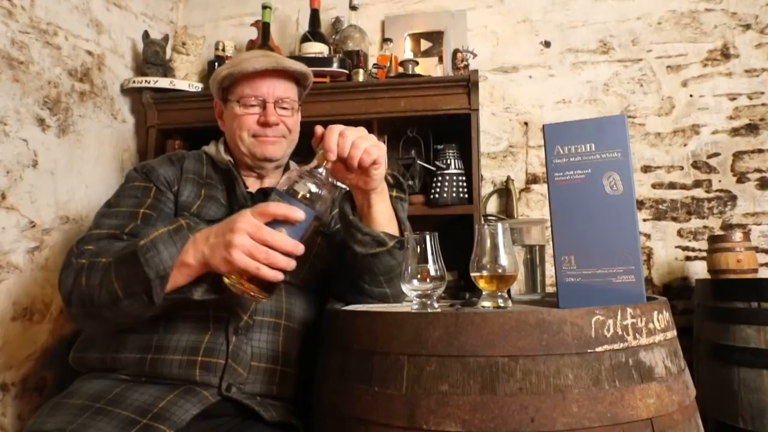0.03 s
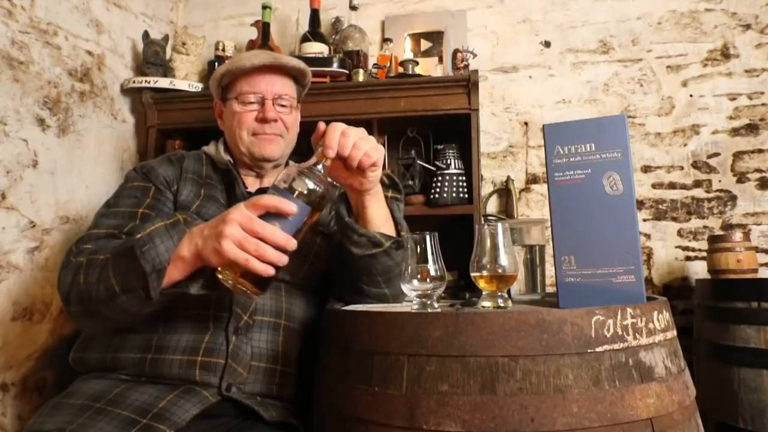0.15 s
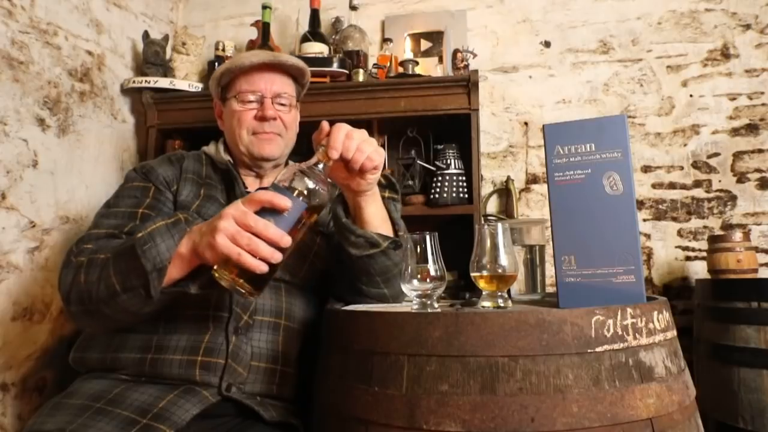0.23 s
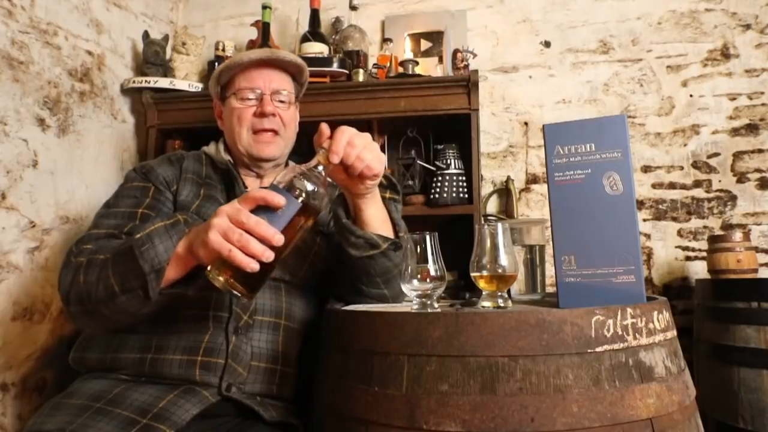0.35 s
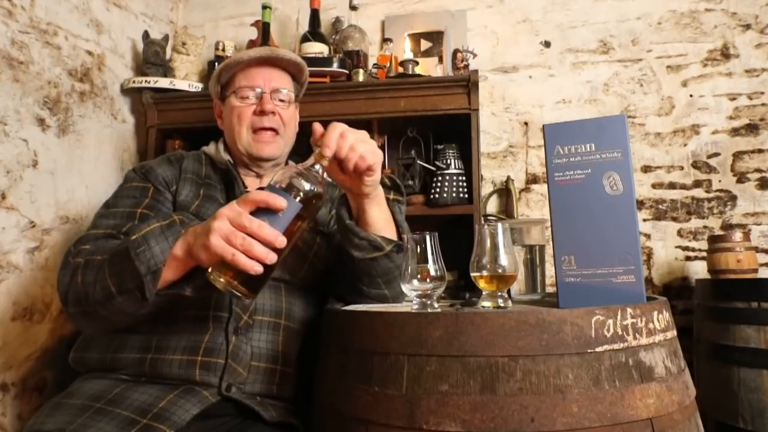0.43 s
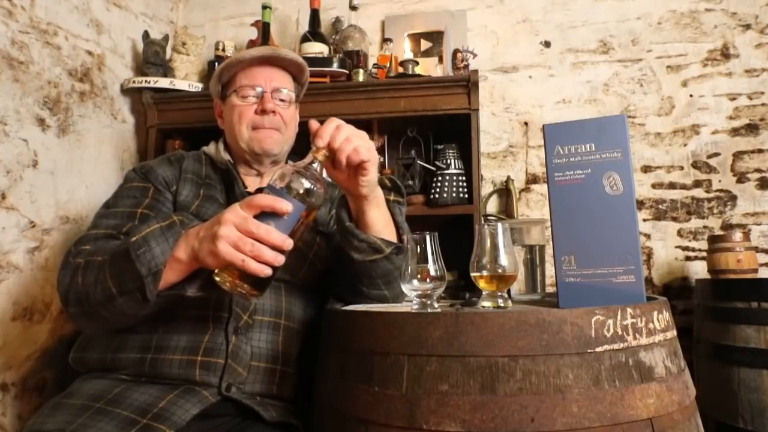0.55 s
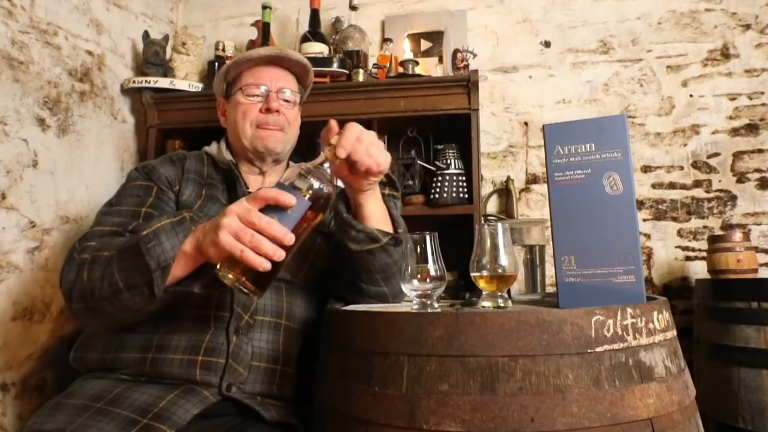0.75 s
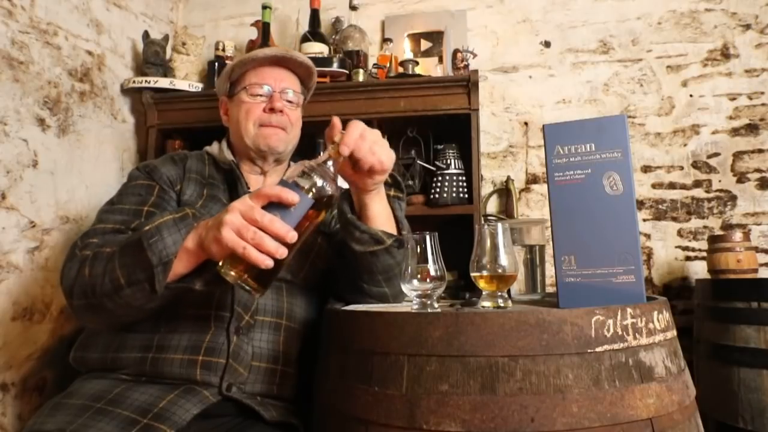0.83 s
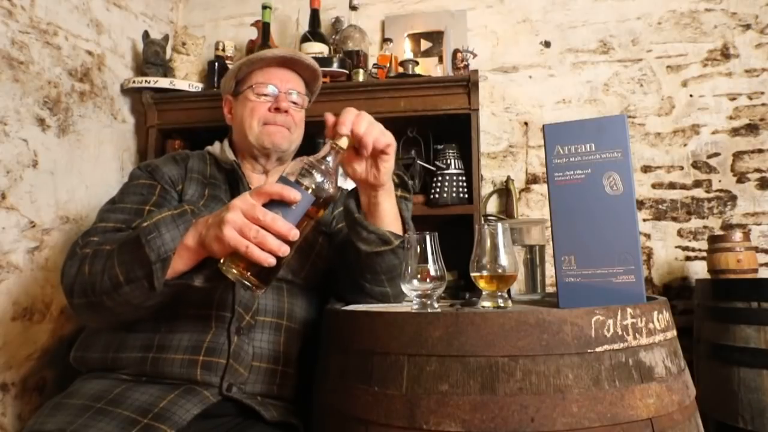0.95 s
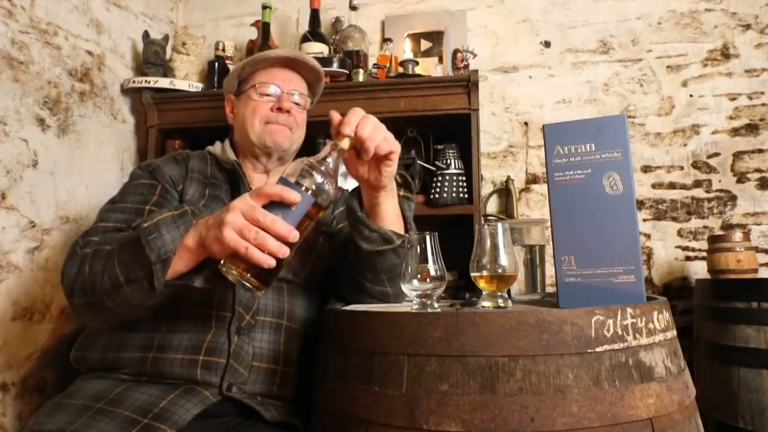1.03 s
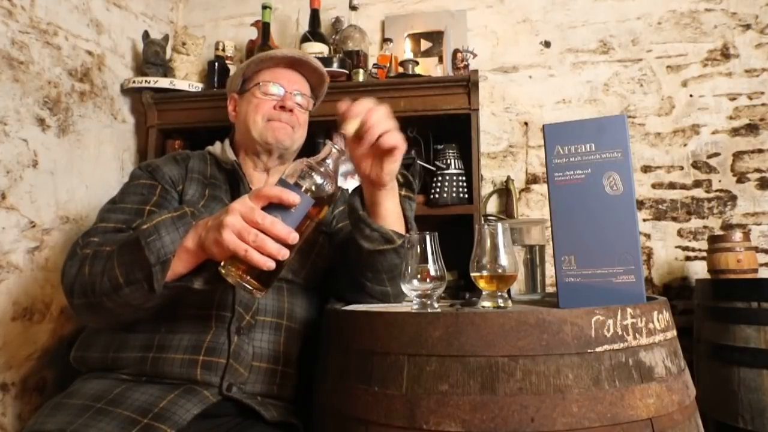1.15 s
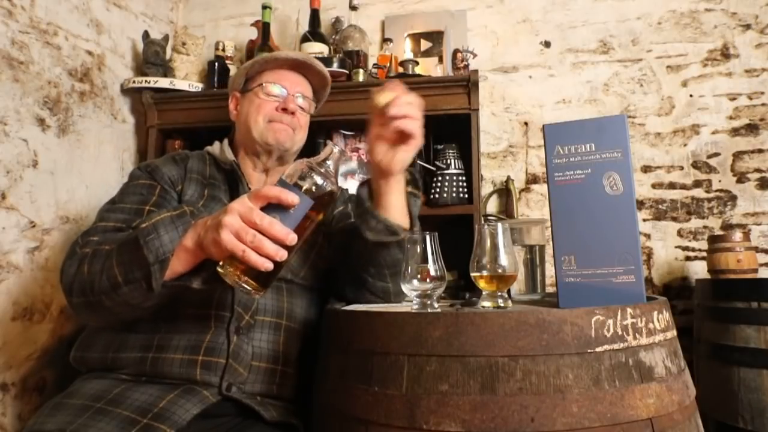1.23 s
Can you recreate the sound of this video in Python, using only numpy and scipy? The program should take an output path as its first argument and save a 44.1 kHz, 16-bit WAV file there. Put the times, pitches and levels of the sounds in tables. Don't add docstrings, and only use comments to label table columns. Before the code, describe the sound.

A cork is twisted out of a glass bottle: faint creak, three separate rubbery squeaks, each louder, breaking into dry ticks, then two very quick rising chirps and a faint hollow pop, close up in a small stone room.

```python
import sys
import numpy as np
from scipy import signal
from scipy.fft import rfft, irfft, next_fast_len
from scipy.io import wavfile

SR = 44100
rng = np.random.default_rng(int(sys.argv[2]) if len(sys.argv) > 2 else 0)


def to_wav(sig):
    pcm = np.clip(np.atleast_2d(sig), -1, 1) * 32767
    pcm = np.round(pcm).astype(np.int16)
    wavfile.write(sys.argv[1], SR, pcm.T)


def volts(x):
    e = np.asarray(x, float) / 20
    return 10 ** e


N = 57330

GRIPS = [
    (2, -1, 0.5, 1.2, -19, 0.5, -18, -13, -24, 4, -11),
    (-23, -17, 3.7, 7.4, -3, -6.5, -7, 0.5, -3, 5, 1.5),
    (-3, 0.5, 3.16, 1.8, 0, 1.5, 3, 4, 3.5, -16, -8.5),
    (-9, -1, 0.78, 0.66, -2, -2, 4, 2.5, 5, -5, -11),
    (6, 1.5, 0.39, 0.75, 3, 3.5, 6, -1, 2.5, -17, -14),
]


def rms_one(x):
    return x / np.sqrt(np.mean(x ** 2) + 1e-20)


def drift(rate_hz, size):
    r = np.exp(-2 * np.pi * rate_hz / SR)
    wander = signal.lfilter([1], [1, -2 * r, r * r], rng.standard_normal(size + 2000))
    return rms_one(wander[2000:])


def low_pass(x, hz):
    return signal.sosfilt(signal.butter(4, hz, fs=SR, output="sos"), x)


def coloured(spectrum):
    hz, db = np.transpose(spectrum)
    f = np.maximum(np.fft.rfftfreq(N, 1 / SR), 1)
    gain = volts(np.interp(np.log(f), np.log(hz), db)) * (f > 30)
    return rms_one(irfft(rfft(rng.standard_normal(N)) * gain, N))


def background():
    # [f/Hz, level/dB per Hz]
    floor_spectrum = [(18, -24), (30, -3), (109, -8.5), (141, -9.5), (404, -10.5), (486, -13), (600, -13),
                      (962, -17.5), (16000, -34)]
    # [f/Hz, level/dB per Hz]
    side_spectrum = [(18, -39), (30, -3), (473, -9), (600, -9), (684, -12), (4080, -9.5), (16000, -11.5)]
    # [t/s, level/dB]
    hum_levels = [(0, -51.5), (.15, -55), (.22, -82), (.5, -75), (1.0, -81), (1.12, -53.5), (1.3, -51)]
    # [t/s, level/dB]
    rustle_levels = [(0, -46.5), (.1, -56.5), (.2, -55), (.7, -80), (1.12, -70), (1.3, -60.5)]
    t = np.arange(N) / SR
    rustle_band = signal.butter(2, [1500, 3400], "band", fs=SR, output="sos")
    rustle = rms_one(signal.sosfilt(rustle_band, rng.standard_normal(N)))
    rustle_db = np.interp(t, *np.transpose(rustle_levels)) + 2.0 * drift(23.0, size=N)
    hum = volts(np.interp(t, *np.transpose(hum_levels))) * np.sin(2 * np.pi * 48 * t)
    middle = volts(-53) * coloured(floor_spectrum) + hum + volts(rustle_db) * rustle
    return middle + volts(-63) * coloured(side_spectrum) * [[1], [-1]]


def body_filters(grip):
    # [f/Hz, width/Hz, level/dB]
    resonances = [(696, 680, -13), (1217, 820, -2.5), (1529, 656, -1.5), (2134, 356, 1), (3040, 625, -0.5),
                  (3557, 665, 2), (4753, 460, -6), (5160, 300, -4), (6070, 4600, -13.5),
                  (10200, 7500, -22.5), (502, 220, -13)]
    for k, ((hz, width_hz, db), change_db) in enumerate(zip(resonances, grip)):
        r = np.exp(-np.pi * width_hz / SR)
        sign = (-1) ** k
        gain = sign * volts(db + change_db) * (1 - r * r) / 2
        yield gain * np.array([1, 0, -1]), [1, -2 * r * np.cos(2 * np.pi * hz / SR), r * r]


def body(x, grip):
    return sum(signal.lfilter(b, a, x + 1e-18) for b, a in body_filters(grip))


def earlier_squeak():
    fade_s, level_db = 0.023, -37
    remains = rng.standard_normal(N) * np.exp(-np.arange(N) / SR / fade_s)
    return volts(level_db) * body(remains, GRIPS[2])


def twist(rows, grip, top_hz, sharper=0.16, hiss_hz=8000):
    attack_s, release_s = 0.00037, 0.001
    jitter_cycles, size_spread_db, hiss_db = 0.3, 5, -7
    wobble_db, wobble_per_s = 3, 67.3
    tilt_from_hz = 1520
    s, *columns = np.transpose(rows)
    start = int(s[0] * SR)
    t = np.arange(start, int((s[-1] + release_s) * SR)) / SR
    timing, sizes, hiss = rng.standard_normal((3, 8000))
    swells = rng.standard_normal((109, 100))

    hz, db, tilt_db, rough = [np.interp(t, s, column) for column in columns]
    rough = np.clip(rough, 0, 1)
    cycles = np.cumsum(hz) / SR
    jitter = np.interp(cycles, np.arange(8000) + .5, timing) / 2
    cycles = cycles + jitter_cycles * rough * jitter

    partial_hz = np.arange(1, 110)[:, None] * hz
    shares = volts(tilt_db * np.log2(np.maximum(partial_hz, tilt_from_hz) / 2000))
    shares = shares * (partial_hz < 17000)
    edge_hz = top_hz * (hz / hz.max()) ** sharper
    shares = shares / np.sqrt(1 + (partial_hz / edge_hz) ** 8)
    wobble_at = (t - t[0]) * wobble_per_s
    swell = np.array([np.interp(wobble_at, np.arange(100), row) for row in swells])
    shares = shares * volts(wobble_db * swell)

    grid_hz = np.linspace(0, SR / 2, 1024)
    response = np.abs(sum(signal.freqz(b, a, grid_hz, fs=SR)[1] for b, a in body_filters(grip)))
    power = np.sum((shares * np.interp(partial_hz, grid_hz, response)) ** 2, axis=0) / 2

    k = np.arange(1, 110)[:, None]
    pulses = np.sum(shares * np.cos(2 * np.pi * k * cycles), axis=0)
    puffs = volts(hiss_db) * rough * low_pass(hiss, hiss_hz)[:len(t)]
    puffs = puffs * np.exp(-3.0 * (cycles % 1)) * np.sqrt(np.sum(shares ** 2, axis=0))
    size = volts(size_spread_db * rough * np.interp(cycles, np.arange(8000), sizes))
    fade = np.clip(np.minimum((t - t[0]) / attack_s, (t[-1] - t) / release_s), 0, 1)
    out = np.zeros(N)
    out[start:start + len(t)] = (pulses + puffs) * size * fade * volts(db) / np.sqrt(power)
    return body(out, grip)


def cork_twists():
    # [t/s, slip rate/Hz, level/dB, tilt/dB per octave, roughness 0-1]
    faint_creak = [
        (.04, 295, -66, -33, 0.5),
        (.06, 286.3, -46, -1, 0.5),
        (.08, 262, -52.5, -21, 0.15),
        (.095, 219, -48, -6, 0.05),
    ]
    first_twist = [(0.211, 823.4, -48, 4.5, 0.066), (0.219, 818, -30, -4.5, 0.13),
                   (0.231, 803, -29.5, -7, 0.034), (0.251, 677.4, -25.5, -6.5, 0.087),
                   (0.271, 691, -25, -7.5, 0.35), (0.283, 635.2, -26.5, -5.5, 0.085),
                   (0.296, 505.7, -32.5, -10, 0.079),
                   (0.304, 504, -28.5, -10.5, 0.17), (.314, 525, -27.5, -6.5, 0.12),
                 (.324, 620.5, -32.5, -4, 0.12), (0.332, 648.7, -27.5, -2.5, 0.1),
                 (0.346, 622.7, -25, -3, 0.25), (.353, 473, -27, -4, 0.47), (0.36, 337, -29.5, -6, 0.3)]
    second_start = [(0.461, 1006, -25.5, -2, 0.04), (0.467, 932, -21, -6, 0.05),
                    (0.485, 946, -20, -1.4, 0.05), (0.505, 765.4, -24, -0.7, 0.06),
                    (.517, 782.3, -23, -5.5, .06), (0.529, 814.8, -25, -1.5, 0.06),
                    (0.552, 721, -24.5, 0.5, 0.08)]
    second_end = [
        (0.563, 786, -26, -1.8, 0.39),
        (0.576, 774.7, -28, -4, 0.12),
        (0.578, 476.6, -34, -13, 0.63),
        (0.594, 246.5, -41.5, -1.8, 0.56),
    ]
    third_start = [(0.711, 985.4, -25.5, -11, 0.04), (0.717, 1033, -19, -4, 0.089),
                   (0.727, 1135, -18, -2.5, 0.046), (.733, 1149, -25, -6, .08),
                   (.74, 1128, -16, -3.5, 0.067), (0.748, 1171, -19, 0, 0.05),
                   (0.756, 1170, -16.5, -3.5, 0.095), (0.764, 1048, -16.5, -3, 0.047)]
    third_end = [
        (0.771, 813.5, -19.5, -0.31, 0.48),
        (.778, 572, -20.5, -0.5, 0.33),
        (.785, 426.3, -22.5, 0.22, 0.21),
        (0.7918, 360, -21, .5, 0.17),
    ]
    faint, first, second, third, _ = GRIPS
    return (twist(faint_creak, faint, top_hz=3700)
            + twist(first_twist, first, top_hz=11100, sharper=0.61, hiss_hz=6500)
            + twist([*second_start, *second_end], second, top_hz=8670, sharper=0.088, hiss_hz=15000)
            + twist([*third_start, *third_end], third, top_hz=12000, sharper=0.67, hiss_hz=7000))


def ticks(rows, grip):
    out = np.zeros(N)
    t = np.arange(1024) / SR
    for s, db, top_hz, grit in rows:
        crack = rng.standard_normal(1024) * grit * np.exp(-t / .0008)
        crack[0] = 1
        crack = body(low_pass(crack, top_hz), grip)
        start = int(s * SR)
        out[start:start + 1024] += volts(db) * crack / np.abs(crack).max()
    return out


def lone_slips():
    # [t/s, peak level/dB, top edge/Hz, grit 0-1]
    first_slips = [
        (.2032, -34, 9000, .1),
        (.3622, -25, 6500, .15),
        (.3668, -21, 7000, .15),
        (.3718, -22, 7500, .15),
        (.3822, -24, 5500, .15),
    ]
    third_slips = [(.7932, -7.5, 7200, .04), (.7965, -7, 7800, .04), (.7998, -10, 7200, .04),
                   (.8033, -10, 6800, .06), (.8068, -7.5, 7800, .04), (.8108, -12.5, 6800, .04),
                   (.8146, -22, 6500, .1), (.8201, -11.5, 7500, .04)]
    snaps = [
        (.3893, -29, 16000, .3),
        (.3921, -22, 16000, .4),
        (.3926, -15, 13000, .12),
        (.4134, -25, 3400, .3),
    ]
    slip_grips = [
        (8, 9, 8, 3, -3, 4, -15, 2, 1.5, -16, -13),
        (-3, 2, -8.5, 0.5, -4, 4.5, 0.5, 5, 12, -5, -23),
        (-7, 4.5, 0.5, 2.5, 5, 3.5, -2.5, -8, 11, 16, -5),
    ]
    runs = zip((first_slips, third_slips, snaps), slip_grips)
    return sum(ticks(rows, grip) for rows, grip in runs)


def pop():
    # [t/s, f/Hz, level/dB, time to fall 60 dB/s]
    knocks = [
        (0.35, 400, -50, .2),
        (0.389, 238, -39, 0.08),
        (0.811, 326, -50, 0.13),
        (0.953, 215, -49, 0.4),
        (1.0, 265, -52, .4),
    ]
    out = 0
    for s, hz, db, t60_s in knocks:
        t = np.maximum(np.arange(N) / SR - s, 0)
        level = volts(db - 60 * t / t60_s + 1.5 * drift(30, size=N))
        out = out + level * np.sin(2 * np.pi * hz * t) * np.minimum(t / .008, 1)
    return out


def last_pull():
    # [t/s, slip rate/Hz, level/dB, tilt/dB per octave, roughness 0-1]
    chirp = [(.909, 1283, -39, -10, .08), (.913, 1874, -27, -1, 0.062), (.919, 2259, -20, 2, 0.24),
             (.925, 2535, -16.5, -8, 0.25), (.931, 2890, -17.5, -0.5, 0.057),
             (.9345, 2937, -11, -7.5, 0.36), (.938, 2770, -17, -5, 0.024)]
    second_chirp = [
        (.9315, 1500, -31, -8, 0.06),
        (.935, 2027, -25, -13, .05),
        (.938, 2243, -14.5, -1, 0.11),
        (.942, 2343, -19, -8.5, 0.18),
        (.9465, 2720, -34, -6, 0.3),
    ]
    return twist(chirp, GRIPS[4], top_hz=11000) + twist(second_chirp, GRIPS[4], top_hz=5960)


def room(x, count):
    t60_s, wall_cut_hz = 0.3, 10100
    size = next_fast_len(N + SR)
    w = 2 * np.pi * np.fft.rfftfreq(size)
    t60 = t60_s / (1 + (w * SR / (2 * np.pi * wall_cut_hz)) ** 2)
    total = 0
    for k, lag in enumerate(rng.uniform(.011, .05, count) * SR):
        loop = volts(-60 * lag / SR / t60) * np.exp(-1j * w * int(lag))
        total = total + (-1) ** k * loop / (1 - loop)
    for lag in (67, 181, 293):
        delay = np.exp(-1j * w * lag)
        total = total * (delay - .6) / (1 - .6 * delay)
    return irfft(rfft(x, size) * total, size)[:N]


def bounce(x, delay_s, db):
    return volts(db) * np.concatenate([np.zeros(int(delay_s * SR)), x])[:N]


def scene():
    cork = cork_twists() + lone_slips() + pop() + last_pull()
    side = volts(-41) * room(cork, count=6) * [[1], [-1]]
    echoes = volts(-23.5) * (room(cork, count=48) + side)
    near_wall = bounce(cork, 0.018, -13.5)
    table_top = bounce(cork, 0.0028, -12)
    return cork + earlier_squeak() + echoes + near_wall + table_top + background()


def roll_off(x):
    return signal.sosfilt(signal.butter(12, 16660, fs=SR, output="sos"), x)


def record(dry):
    low_cut = signal.butter(3, 45, "high", fs=SR, output="sos")
    top_cut = signal.cheby2(10, 50, 16900, fs=SR, output="sos")
    mix = signal.sosfilt(np.vstack([low_cut, top_cut]), dry)
    return roll_off(mix)


dry = scene()
out = record(dry)
to_wav(out)
```